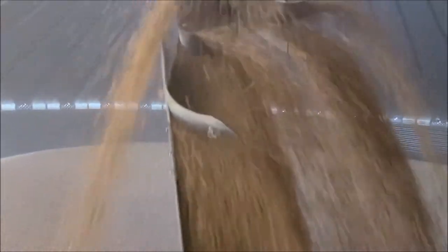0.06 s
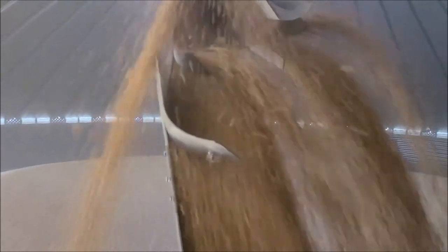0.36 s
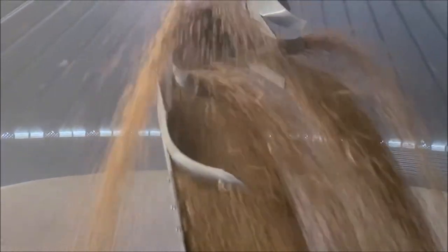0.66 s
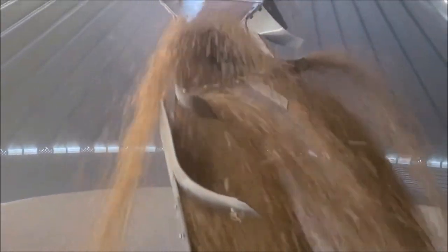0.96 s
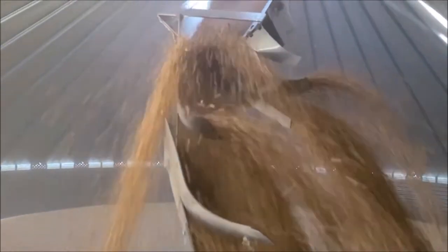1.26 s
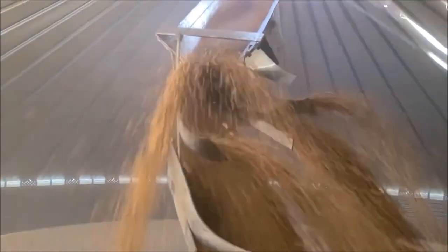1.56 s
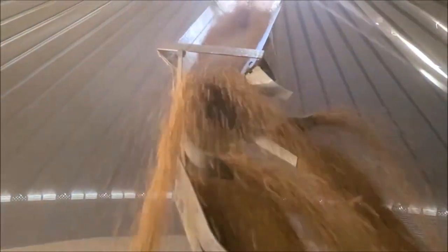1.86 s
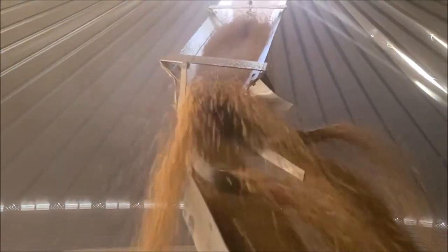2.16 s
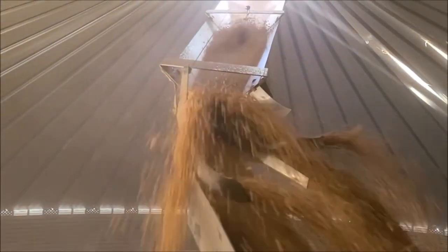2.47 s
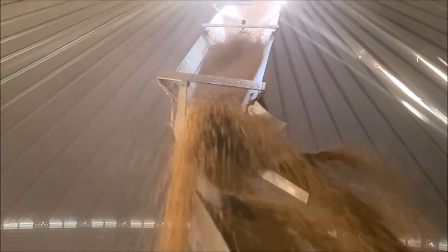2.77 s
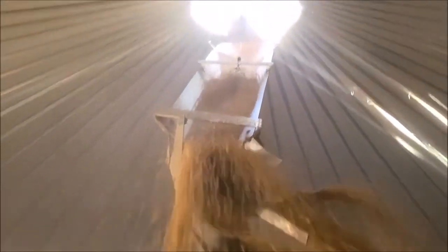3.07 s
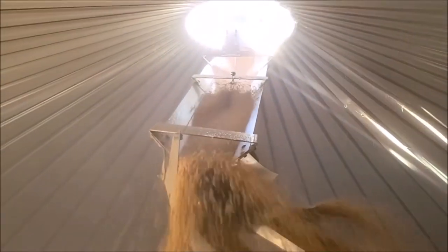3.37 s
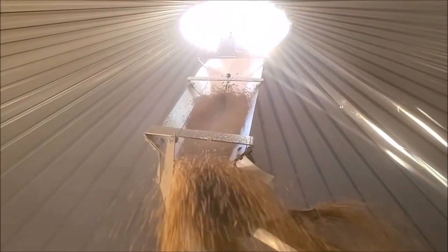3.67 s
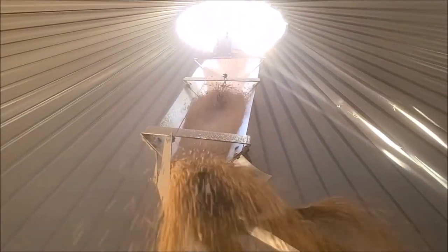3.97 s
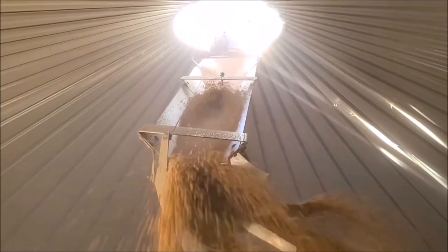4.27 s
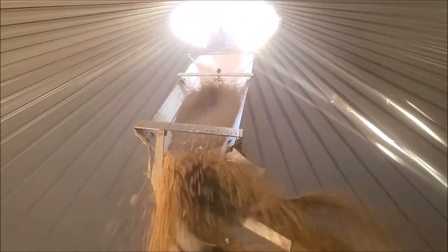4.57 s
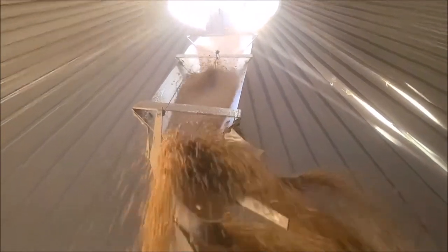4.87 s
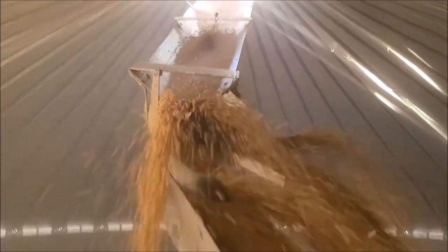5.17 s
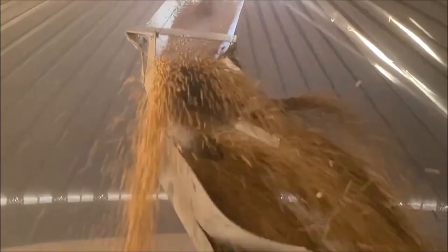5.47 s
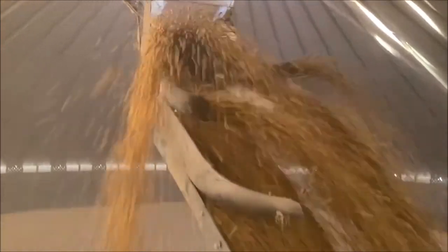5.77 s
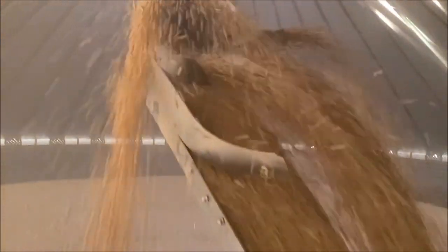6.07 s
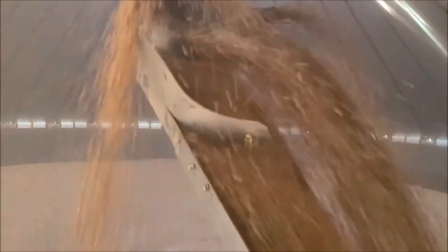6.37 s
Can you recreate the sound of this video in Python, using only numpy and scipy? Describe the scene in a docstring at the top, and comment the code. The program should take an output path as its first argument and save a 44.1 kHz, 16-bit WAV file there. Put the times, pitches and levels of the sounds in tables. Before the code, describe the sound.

A dense, sizzling rush of grain hitting steel is heard from the start, close by and mostly to the right. Beneath it are the dull roar of a big storage bin, a faint metallic ring and a low motor hum. The tone shifts slightly as the microphone tilts up and back down. After the first third, everything fades gradually until it is quiet.

```python
"""Grain pouring into a steel bin.

Grain falls from a chute onto a steel spreader, close to a camera that tilts up and back down.
Countless kernel impacts merge into a hiss, mostly on the right, and excite the modes of the steel.
Behind them the bin reverberates with a dull roar and a motor hums.
The level holds for about a third of the scene, then fades steadily."""
import sys
import numpy as np
from scipy import signal
from scipy.fft import rfft, irfft
from scipy.io import wavfile
from scipy.ndimage import uniform_filter1d

SR = 44100
rng = np.random.default_rng(int(sys.argv[2]) if len(sys.argv) > 2 else 0)


def unload_audio(sound):
    """Save the sound as a 16-bit wav file, at the path given as the first command line argument."""
    columns = np.transpose(np.atleast_2d(sound))
    # keep every value between -1 and 1, then stretch to whole-number steps
    steps = np.round(np.clip(columns, -1, 1) * 32767)
    wavfile.write(sys.argv[1], SR, steps.astype(np.int16))


N = 287973
TIME, HZ = np.arange(N) / SR, np.fft.rfftfreq(N, 1 / SR)


def gain_of(db):
    """Amplitude ratio of a level in decibels."""
    return 10 ** (np.asarray(db) / 20)


def unit_rms(x):
    """Normalisation to an rms of one."""
    return x / np.sqrt(np.mean(x ** 2) + 1e-20)


def over_frequency(rows):
    """Interpolation of each column of a table along a logarithmic frequency axis."""
    hz, *columns = np.transpose(rows)
    return np.array([np.interp(np.log(HZ + 1), np.log(hz + 1), column) for column in columns])


def flat_spectrum(x):
    """Spectrum of a white excitation, scaled to a power density of 0 dB per Hz."""
    return rfft(unit_rms(x)) * np.sqrt(SR / 2)


def wander(rate_hz):
    """Random modulation: noise of unit rms, low-passed near the given rate."""
    band = np.exp(-(HZ / rate_hz) ** 2) * (HZ > .5)
    return unit_rms(irfft(rfft(rng.standard_normal(N)) * band, N))


def camera_tilt(rise_s=3.6, hold_s=1.57, descent_s=1.6, top=0.77):
    """Microphone aim (0 level, 1 full tilt, at the roof hatch): eased rise, hold, uniform descent."""
    rise = np.sin(np.pi / 2 * np.minimum(TIME / rise_s, 1))
    descent = np.clip((TIME - rise_s - hold_s) / descent_s, 0, 1)
    return top * rise * (1 - descent)


def motor_hum(hz=61.02, level_db=-53.3, waver_db=0.35):
    """Periodic vibration: the feed motor radiates one low tone that wavers slightly in level."""
    tone = np.sqrt(2) * np.sin(2 * np.pi * (hz * TIME + rng.random()))
    return tone * gain_of(level_db + waver_db * wander(rate_hz=5))


def wall_echoes(x, t60_s=0.097, count=300, level_db=-15):
    """Reverberation: scattered reflections from wall and roof weaken exponentially with delay."""
    delays = rng.integers(SR // 200, SR // 3, (2, count))
    reflections = rng.choice([-1, 1], delays.shape) * gain_of(-60 * delays / SR / t60_s)
    response = np.zeros((2, N))
    np.put_along_axis(response, delays, reflections, axis=1)
    response /= np.linalg.norm(response, axis=1, keepdims=True)
    return gain_of(level_db) * irfft(rfft(x) * rfft(response), N)


# The bin's sound field at the two microphones.
# Each row: frequency in Hz, coherence from 0 to 1, phase lead of the left in radians.
FIELD_COHERENCE = [(50, .84, 0), (150, .88, 0), (950, .82, -.1), (1350, .45, -.3), (1900, .42, .5),
                   (2600, .25, 1.4), (3100, .35, 2.9)]
def diffuse_field():
    """Spatial coherence: white sound from all sides is alike at both microphones mainly in the bass."""
    right, independent = flat_spectrum(rng.standard_normal((2, N)))
    coherence, lead = over_frequency(FIELD_COHERENCE)
    left = coherence * right + np.sqrt(1 - coherence ** 2) * independent
    return np.array([left * np.exp(1j * lead), right])


# The falling mass of grain, echoing round the bin.
# Each row: frequency in Hz, left and right spectral density in relative dB.
ROAR_SPECTRUM = [(15, -86, -86), (45, -80, -80.5), (90, -76, -76), (180, -74.8, -74.8), (210, -72.7, -72.7),
                 (390, -73.5, -73.5), (450, -69.7, -68.8), (850, -68.8, -66.3), (1070, -70.5, -65),
                 (1380, -69, -60.3), (1800, -69, -60.4), (2300, -72, -63.7), (2900, -68.3, -67.3),
                 (3500, -75, -75), (6000, -95, -95)]
def bin_roar(surge_db=0.5):
    """Reverberant noise: the dull rush of the stream fills the bin and surges slightly with the flow."""
    rush = irfft(diffuse_field() * gain_of(over_frequency(ROAR_SPECTRUM)), N)
    return rush * gain_of(surge_db * wander(rate_hz=14))


# Modes of the spreader, chute and bin. Each row: frequency in Hz, bandwidth in Hz,
# left and right peak density at half tilt in relative dB, gain from level to full tilt in dB.
STEEL_MODES = [(153, 28, -73.5, -73, -2), (262, 36, -74.3, -72.8, 0), (501, 25, -73.5, -71.8, 3),
               (634, 48, -70.2, -68.6, -2), (760, 40, -74, -72, 4), (937, 76, -67.5, -66.4, 4),
               (1182, 25, -68, -67, -3), (1271, 16, -66.5, -61.5, -7), (1367, 24, -65.5, -62.5, -4),
               (1717, 14, -71, -63, 0), (1785, 30, -76, -65, 2), (1875, 30, -77, -66.5, 1),
               (1980, 45, -77, -68, -12), (2440, 40, -80, -68.5, -10), (2805, 14, -73, -64.5, 0),
               (4237, 35, -68.5, -66, 0), (4698, 50, -72, -59.3, -2), (5179, 25, -78, -58.5, -5),
               (6255, 65, -74, -53.5, 7), (6385, 32, -72, -53, 8), (6831, 30, -71, -52, 12),
               (7060, 90, -70, -55, 2), (7165, 28, -64, -54.5, 5), (7290, 110, -72, -57.5, -4),
               (8340, 200, -66.5, -70, 0), (9884, 35, -76, -65, 12), (10230, 60, -78, -66.5, 10),
               (11585, 26, -68, -57.5, 0), (12360, 60, -80, -60, -5), (15570, 30, -80, -63, 12)]
def steel_ring(skirt_widths=4, gain_db=3.0):
    """Forced resonance: steady impacts keep every mode ringing; the tilt shifts their balance."""
    level, raised = np.zeros((2, 2, len(HZ)), complex)
    for hz, width_hz, left_db, right_db, tilt_db in STEEL_MODES:
        detune = (HZ - hz) / width_hz
        peak = gain_of([[left_db], [right_db]])
        mode = peak / ((1 + 2j * detune) * (1 + 1j * detune / skirt_widths))
        level += mode * gain_of(-tilt_db / 2)
        raised += mode * gain_of(tilt_db / 2)
    drive, up = diffuse_field(), camera_tilt()
    return gain_of(gain_db) * ((1 - up) * irfft(drive * level, N) + up * irfft(drive * raised, N))


def stray_ticks(per_s=80, spots=8, t60_s=0.006, spread_db=1.7, level_db=-17.5):
    """Impulse response: single kernels glance off nearby steel, each spot with its own damped rattle."""
    t, ticks = np.arange(0, t60_s, 1 / SR), np.zeros((2, N))
    for _ in range(spots):
        hits = rng.random(N) < per_s / spots / SR
        strength = gain_of(spread_db * np.minimum(rng.exponential(1, N), 4))
        rattle = rng.standard_normal((2, len(t))) * gain_of(-60 * t / t60_s)
        ticks += signal.oaconvolve((hits * strength)[None], rattle, axes=1)[:, :N]
    return gain_of(level_db) * unit_rms(ticks)


# Kernels striking steel and each other.
# Each row: frequency in Hz, left and right spectral density in relative dB.
HISS_SPECTRUM = [(2000, -90, -90), (3400, -70.3, -70.8), (4700, -64, -59.5), (5330, -64, -56.2),
                 (5530, -63.9, -51.7), (6750, -63, -52.7), (7270, -62.2, -49.9), (7720, -63.7, -61.3),
                 (8600, -64.3, -65), (8900, -64.3, -63.7), (9700, -67, -62.5), (10700, -66.8, -61.5),
                 (11900, -65.2, -56.2), (15700, -66.4, -58.2)]
# The fine sizzle at the right microphone. Each row: time in seconds, gain in dB.
SIZZLE_GAIN = [(0, -1), (2.5, 0), (4.6, -0.5), (5.3, 1.5), (6, 1.0), (6.5, 2.5)]
def kernel_hiss(per_s=30000, spread_db=1.9, clump_db=0.36, sizzle_hz=11300):
    """Shot noise: random impacts merge into a loosely clumped hiss, under a smoother high sizzle."""
    hits = rng.random((2, N)) < per_s / SR
    strength = gain_of(spread_db * np.minimum(rng.exponential(1, (2, N)), 7))
    clicks = unit_rms(hits * strength * rng.choice([-1, 1], (2, N))) + stray_ticks()
    spectrum = flat_spectrum(clicks) * gain_of(over_frequency(HISS_SPECTRUM))
    highpass = np.array([[0], [.5]]) * (1 + np.tanh((HZ - sizzle_hz) / 400))  # right side only
    clumps = irfft(spectrum * (1 - highpass), N) * gain_of(clump_db * wander(rate_hz=45))
    sizzle = irfft(spectrum * highpass, N) * gain_of(np.interp(TIME, *np.transpose(SIZZLE_GAIN)))
    return clumps + sizzle


def spray_flicker(x, frame_samples, patch_frames, depth_db=1.9):
    """Spectral modulation: as the spray changes shape, narrow bands of its sound swell and dip."""
    spectra = signal.stft(x, nperseg=frame_samples)[2]
    patches = uniform_filter1d(rng.standard_normal(spectra.shape), patch_frames, axis=2)
    patches = unit_rms(uniform_filter1d(patches, 2, axis=1))  # two frequency bins wide
    gain = unit_rms(gain_of(depth_db * patches))
    return signal.istft(spectra * gain, nperseg=frame_samples)[1][:, :N]


# Directional response of the right microphone.
# Each row: frequency in Hz, gain from level to full tilt in dB.
TILT_RESPONSE = [(800, 2), (1400, -2.5), (1900, 0.5), (3800, -2), (5600, 1.5), (6500, 2.5), (7600, 1),
                 (10000, 3), (11200, 1), (12000, -5.5), (13100, -4), (14500, -1), (15600, 8)]
def tilt_colour(x):
    """Directivity: the timbre shifts with the angle at which the spray's sound meets the microphone."""
    up, colour_db = camera_tilt(), over_frequency(TILT_RESPONSE)[0]
    level, raised = irfft(rfft(x) * gain_of([-colour_db / 2, colour_db / 2]), N)
    return (1 - up) * level + up * raised


def scene(hiss_db=-0.28, roar_db=-0.5, shade_db=-0.05):
    """Superposition at two microphones: the right faces the spray, the left is shaded from it."""
    hiss = gain_of(hiss_db) * spray_flicker(kernel_hiss(), frame_samples=512, patch_frames=9)
    roar = gain_of(roar_db) * spray_flicker(bin_roar(), frame_samples=1024, patch_frames=7)
    grain = hiss + roar
    left, right = grain + wall_echoes(grain) + steel_ring()
    shade = gain_of(shade_db * camera_tilt())  # the left turns away as the camera looks up
    return np.array([left * shade, tilt_colour(right)]) + motor_hum()


def record(dry, fade_start_s=2.346, to_silence_s=4.955, cutoff_hz=15750):
    """Attenuation and band limiting: a linear fade of amplitude, then a steep low-pass filter."""
    fade = np.clip(1 - (TIME - fade_start_s) / to_silence_s, 0, 1)
    lowpass = signal.firwin(1023, cutoff_hz, window=("kaiser", 9), fs=SR)
    return signal.oaconvolve(dry * fade, lowpass[None], "same", axes=1)


dry = scene()
out = record(dry)
unload_audio(out)
```